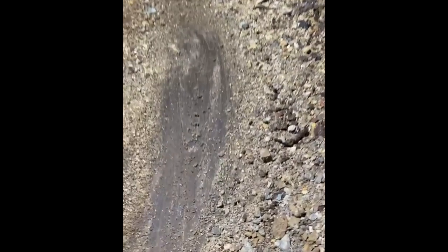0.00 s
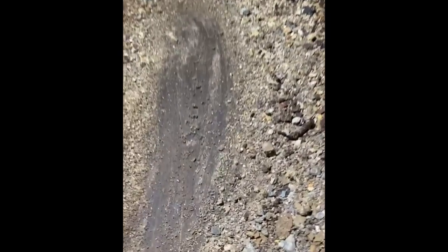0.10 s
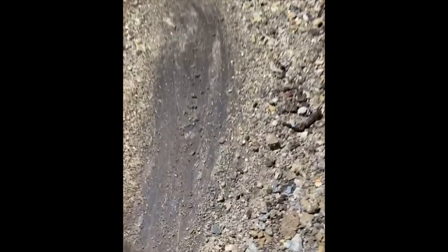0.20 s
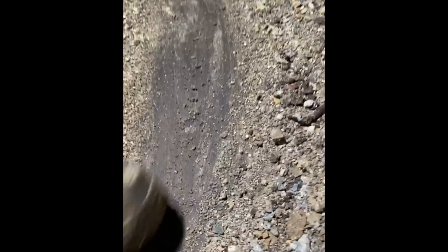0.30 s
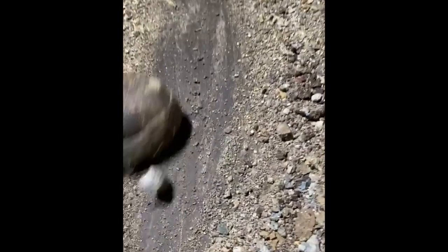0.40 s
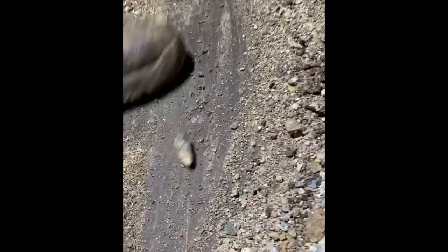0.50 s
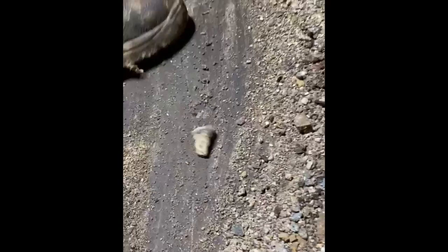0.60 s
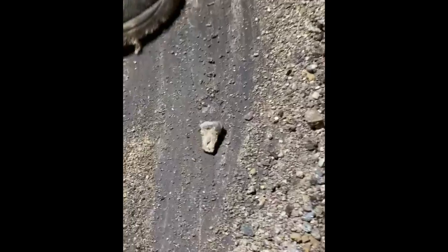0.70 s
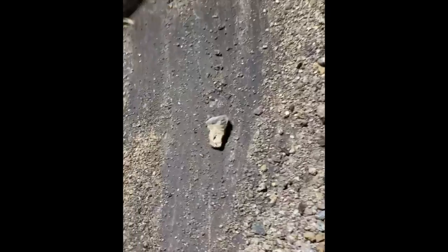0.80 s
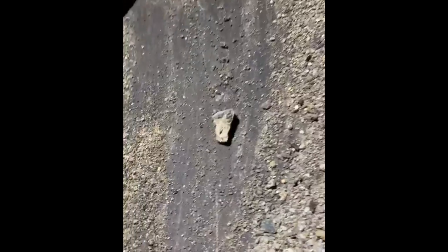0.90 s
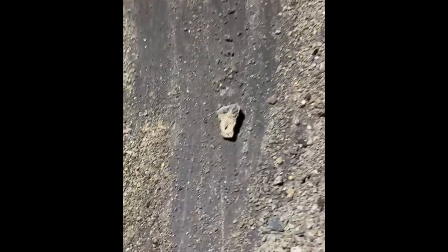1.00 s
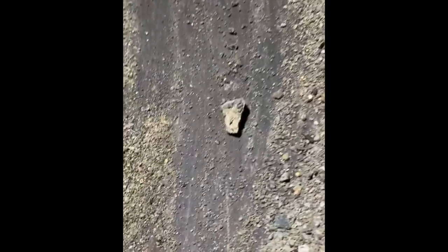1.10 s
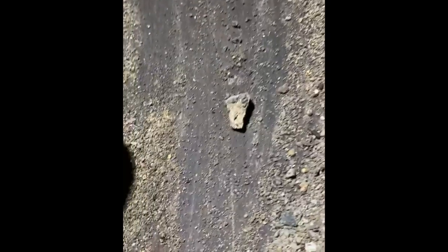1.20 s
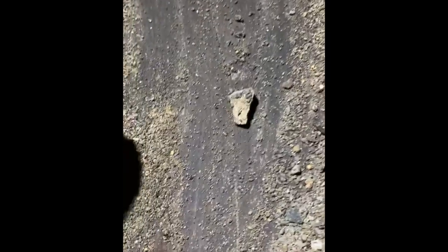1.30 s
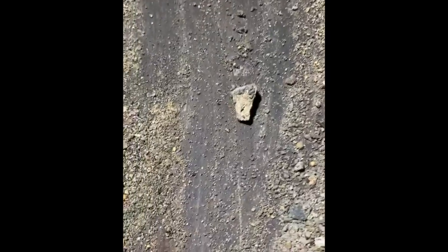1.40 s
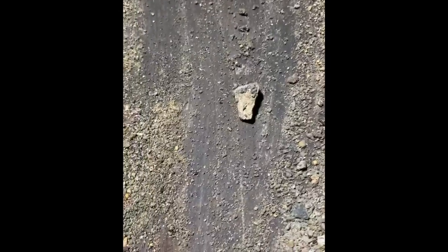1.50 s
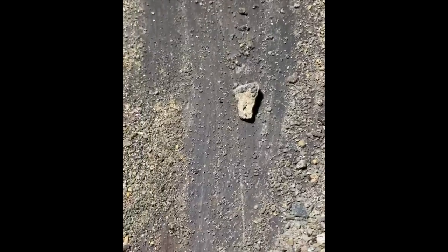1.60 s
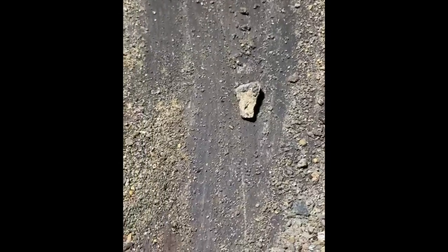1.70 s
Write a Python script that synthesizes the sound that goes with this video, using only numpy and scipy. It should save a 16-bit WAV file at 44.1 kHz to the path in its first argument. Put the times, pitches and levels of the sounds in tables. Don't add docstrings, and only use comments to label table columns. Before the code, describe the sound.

A work boot scrapes over gritty ground, kicks a stone loose with a crunch and thud

```python
import sys
import numpy as np
from scipy import signal
from scipy.fft import rfft, irfft, next_fast_len
from scipy.io import wavfile
from scipy.ndimage import uniform_filter1d

SR = 44100
rng = np.random.default_rng(int(sys.argv[2]) if len(sys.argv) > 2 else 0)


def digitize_waveform(pressure):
    field = np.atleast_2d(pressure).T
    bounded = np.clip(field, -1, 1)
    quanta = np.round(bounded * 32767).astype(np.int16)
    wavfile.write(sys.argv[1], SR, quanta)


def gain_from_decibels(decibels):
    exponent = np.asarray(decibels, float) / 20
    return 10 ** exponent


N = 79380

FAR_S = 1.44
STRIKE_RISE_S = 0.0003
# time_s, scrape_level_db, speed_db (treble gain), weight_db (rumble gain)
SOLE_MOTION = [(0, -48.5, -11, 23.5), (0.098, -44.5, -13, 2.5), (0.189, -36.5, -19, 8),
               (0.287, -41, -17, 10), (.338, -45, 0, 20), (.372, -35, -15, 8.5), (.47, -31, -8, -15),
               (0.498, -30, -13.5, 5), (0.521, -40, -4, -10), (0.632, -41.5, -4, 0.5),
               (0.776, -41.5, -1.5, 8), (.84, -54.5, -6.5, 6.5), (1.113, -63.5, -3, -1),
               (1.18, -74.5, 0.5, -3), (1.456, -70, -5.5, 4), (1.502, -48, -13, -2),
               (1.687, -53.5, -9, 7.5), (1.74, -65.5, 1, 3.5)]


def evened(x):
    return x / np.sqrt(np.mean(x ** 2) + 1e-20)


def read(points, hz):
    f, value = np.transpose(points)
    return np.interp(np.log(hz + 1), np.log(f + 1), value)


def add(mix, start_s, sound):
    part = mix[round(start_s * SR):][:len(sound)]
    part += sound[:len(part)]


def coloured(x, spectrum):
    hz = abs(np.fft.fftfreq(8192, 1 / SR))
    below = (spectrum[0][0] / 2, -70)
    above = (spectrum[-1][0] * 2, -70)
    log_gain = np.log(gain_from_decibels(read([below] + list(spectrum) + [above], hz)))
    response = np.exp(log_gain - 1j * signal.hilbert(log_gain).imag)
    taps = np.fft.ifft(response).real[:4096]
    return signal.oaconvolve(x, taps / np.linalg.norm(taps))[:len(x)]


def grains(per_s, spread_db):
    when = rng.random(N)
    size = rng.exponential(1, N)
    sign = rng.choice([-1., 1.], N)
    height = gain_from_decibels(spread_db * np.minimum(size, 4))
    return evened(sign * height * (when < per_s / SR))


def ring(hz, t60, rise_s, t):
    return (1 - np.exp(-t / rise_s)) * gain_from_decibels(-60 * t / t60) * np.sin(2 * np.pi * hz * t)


def scrape():
    # pitch_hz, density_db (per Hz)
    warm_lead_in = [(120, -31.5), (200, 3.5), (273, 4), (369, -15), (511, -9.5), (906, -9), (1030, -9),
                    (1320, -12), (4500, -38.5), (5850, -71), (9900, -120)]
    bright_push = [(120, -33.5), (200, -2.5), (449, -5), (621, -10.5), (726, -10), (1060, -3.5),
                   (1670, -4.5), (3080, -8.5), (4500, -15), (5850, -45.5), (9900, -120)]
    eased_drag = [(88, -39), (150, 4), (514, -3.5), (570, -4), (1010, -2.5), (1370, -6), (2910, -12),
                  (5000, -26), (6500, -52), (11000, -120)]
    hollow_far_shuffle = [(88, -50), (150, 1), (593, -1.5), (883, -36), (1180, -0.5), (1510, -14.5),
                          (1990, -11.5), (4000, -34), (5200, -95), (8800, -120)]
    sand_spectrum = [(2000, -2), (3000, -8), (4800, -2), (6800, -9.5), (10000, -11), (13000, -12),
                     (16000, -38)]
    rumble_spectrum = [(12, -58.5), (20, -15.5), (76, 2), (108, -5.5), (141, -5), (190, -15.5), (219, -10),
                       (350, -17.5), (460, -48), (770, -120)]

    t = np.arange(N) / SR
    rows = np.transpose(SOLE_MOTION)
    level, speed, weight = (np.interp(t, rows[0], c) for c in rows[1:])
    jerks = signal.lfilter(*signal.butter(2, 200, fs=SR), rng.standard_normal(N))
    slip_db = 2.0 * evened(jerks)

    rub = grains(per_s=4000, spread_db=1.5) * gain_from_decibels(level + slip_db)
    stage = np.searchsorted([0.3, 0.505, FAR_S], t)
    bodies = (warm_lead_in, bright_push, eased_drag, hollow_far_shuffle)
    grit = sum(coloured(rub * (stage == k), body) for k, body in enumerate(bodies))

    sand_hits = grains(per_s=9000, spread_db=-0.5)
    sand = coloured(sand_hits * gain_from_decibels(level + speed + 0.5 * slip_db), sand_spectrum)
    ground = rng.standard_normal(N) * gain_from_decibels(level + weight + 0.6 * slip_db)
    return grit + sand + coloured(ground, rumble_spectrum)


def patchy(x):
    patch_db = 2.0
    z = signal.stft(x, nperseg=256, noverlap=192)[2]
    field = rng.standard_normal(z.shape[::-1]).T
    field = uniform_filter1d(field, size=3, axis=0)
    field = evened(uniform_filter1d(field, size=30, axis=1))
    return signal.istft(z * gain_from_decibels(patch_db * field), nperseg=256, noverlap=192)[1][:N]


def rolling():
    roll_db, ring_cycles = -10, 5
    t = np.arange(N) / SR
    rows = np.transpose(SOLE_MOTION)
    pitches = np.geomspace(600, 4500, num=16)
    clicks = grains(per_s=900, spread_db=4.0)
    which = rng.integers(0, len(pitches), N)
    out = np.zeros(N)
    for k, hz in enumerate(pitches):
        click = ring(hz, ring_cycles / hz, STRIKE_RISE_S, t[:800])
        out += signal.oaconvolve(clicks * (which == k), click)[:N]
    return evened(out) * gain_from_decibels(np.interp(t, rows[0], rows[1]) + roll_db)


def stone(modes):
    damping = 0.4
    t = np.arange(3000) / SR
    taps = sum(gain_from_decibels(db) * ring(hz, damping * t60, 0.0001, t) for hz, db, t60 in modes)
    return taps / np.linalg.norm(taps)


def crunches():
    near_s = [.006, .038, .0575, .114, .1325, .169, .185, .213, .232, .2525, .26, .293, .2985, .308, .349,
              .364, .4955, .661]
    late_s = [.9935, 1.5, 1.527, 1.604, 1.6365, 1.674]
    # level_db, length_s, mid_gain_db, treble_gain_db
    bursts = [(-36, 0.008, 4, 9), (-49, 0.006, 10, 16.5), (-34.5, 0.011, -5, 3.5), (-39.5, 0.018, 1.5, 6),
              (-32.5, 0.01, -13, -5.5), (-38, 0.024, -7, 3), (-38.5, 0.0043, -4, 3), (-35, 0.0043, -7, 3),
              (-36.5, 0.012, -1.5, 6), (-39.5, 0.006, 3, 13.5), (-30.5, 0.0073, -5.5, -2.5),
              (-40, 0.034, -10.5, 0), (-24.5, 0.0054, -7, 4.5), (-15.5, 0.02, 6, 7), (-21.5, .0145, 8.5, 3),
              (-29, 0.012, 9.5, -4.5), (-32.5, 0.0047, -20, -24.5), (-34.5, 0.0026, -14, -9.5),
              (-53, 0.0038, 13, 8.5), (-51, 0.0063, 4, 17.5), (-42.5, 0.01, -15, 3.5),
              (-41.5, 0.014, -0.5, 3.5), (-34.5, 0.0022, 1.5, -1), (-52, 0.0028, 10, 16.5)]
    # pitch_hz, density_db (per Hz)
    crack_spectrum = [(120, -5), (280, -2), (600, -9), (1100, -5.5), (4300, -22), (7500, -19.5),
                      (12000, -28.5), (15500, -31.5)]
    # pitch_hz, level_db, t60_s
    near_modes = [(743, 0, .13), (290, -6, .1), (1000, -6, .05), (1244, -7, .06), (1470, -9, .05),
                  (2196, -12, .04)]
    far_modes = [(1210, -10, 0.063), (610, 0, 0.056)]
    cracks_per_s, crack_spread_db, stone_db = 1200, 12.0, -5
    mid_hz, treble_hz = 2500, 7300

    dull, mid, bright = np.zeros((3, N))
    far = np.arange(N) / SR >= FAR_S
    shape = (len(bursts), 1500)
    when = rng.random(shape)
    size, hiss = rng.standard_normal((2, *shape))
    cracks = size * gain_from_decibels(crack_spread_db) * (when < cracks_per_s / SR) + hiss

    for start_s, (db, length_s, mid_db, treble_db), crack in zip(near_s + late_s, bursts, cracks):
        u = np.arange(0, 1, 1 / (min(length_s, 0.03) * SR))
        swell = np.minimum(0.3 + u / 0.3, 1) * np.sqrt(1 - u ** 3)
        burst = gain_from_decibels(db) * evened(crack[:len(u)]) * swell
        add(dull, start_s, burst)
        add(mid, start_s, gain_from_decibels(mid_db) * burst)
        add(bright, start_s, gain_from_decibels(treble_db) * burst)

    bands = (mid_hz, "low", dull), ([mid_hz, treble_hz], "band", mid), (treble_hz, "high", bright)
    split = sum(signal.lfilter(*signal.butter(2, hz, kind, fs=SR), x) for hz, kind, x in bands)
    noise = coloured(split, crack_spectrum)
    near_rings = signal.oaconvolve(dull * ~far, stone(near_modes))
    far_rings = signal.oaconvolve(dull * far, stone(far_modes))
    return noise + gain_from_decibels(stone_db) * (near_rings + far_rings)[:N]


def thuds():
    # start_s, peak_db, pitch_hz, t60_s
    ground_thuds = [(0.176, -16, 83, 0.13), (0.2, -10, 80, 0.09), (0.267, -29, 95, 0.099),
                    (0.3813, -20, 76.8, 0.33), (0.5203, -14, 76, 0.12), (.762, -26, 151.5, 0.11),
                    (1.057, -43, 228, 0.058), (1.237, -52, 64.1, 0.22), (1.521, -35, 62.5, 0.17),
                    (1.603, -26, 94.6, 0.079), (1.674, -37, 70.5, 0.24),
                    (.3035, -4, 135, .075),
        (.3228, 3, 76, .14),
        (.7392, -11, 135, .07),
        (.7655, -25, 255, .09),
    ]
    rise_s = 0.008
    out, t = np.zeros(N), np.arange(SR // 2) / SR
    for start_s, db, hz, t60 in ground_thuds:
        boom = ring(hz, t60, rise_s, t)
        overtone = 0.22 * ring(1.83 * hz, 0.6 * t60, rise_s, t)
        add(out, start_s, -gain_from_decibels(db) * (boom + overtone))
    return out


def strikes():
    # start_s, peak_db, pitch_hz, t60_s
    knocks_and_ticks = [(.0585, -40, 820, 0.063), (0.118, -30.5, 2560, .012), (.1325, -29, 940, 0.042),
                        (.171, -25, 876, 0.023), (.179, -25, 493, 0.047), (.215, -25.5, 560, 0.041),
                        (.2345, -25.5, 920, 0.035), (.26, -23.5, 497, 0.047), (.299, -10.5, 920, 0.006),
                        (.3098, -10, 759, 0.082), (.3092, -8.5, 1200, 0.02), (.315, -12.5, 306, 0.043),
                        (.3215, -25, 888, 0.073), (.351, -18, 770, 0.022), (.3555, -16.5, 811, .04),
                        (.355, -20.5, 294, .07), (.3555, -12.5, 1754, 0.013), (.379, -27, 700, 0.017),
                        (.459, -10.5, 6700, 0.0019), (.4615, -26, 1080, 0.015), (.494, -32, 2500, 0.0061),
                        (.4975, -18.5, 1040, 0.013), (.5005, -12, 332, 0.01), (.534, -31, 1330, 0.03),
                        (.662, -27, 3030, 0.0053), (.845, -39, 606, 0.033), (.9945, -32.5, 2780, 0.0035),
                        (1.066, -46, 330, 0.064), (1.533, -49, 5770, 0.0074), (1.55, -37, 1200, .02),
                        (1.548, -44, 7630, 0.0091), (1.574, -35, 538, 0.019), (1.589, -46, 6200, .005),
                        (1.607, -37, 1150, 0.03), (1.606, -44, 7700, 0.012), (1.659, -43, 610, .02),
                        (1.676, -40, 5400, .006), (1.708, -49, 6000, .003)]
    out, t = np.zeros(N), np.arange(4000) / SR
    for start_s, db, hz, t60 in knocks_and_ticks:
        add(out, start_s, gain_from_decibels(db) * ring(hz, t60, STRIKE_RISE_S, t))
    return out


def pebbles():
    # start_s, peak_db, pitch_hz
    pebble_hits = [(0.8455, -43, 1220), (0.9028, -38, 1900), (1.0281, -75, 1170), (1.048, -42.5, 2500),
                   (1.0604, -40.5, 2384), (1.0859, -63, 1850), (1.0989, -44, 2640), (1.1104, -51.5, 2900),
                   (1.2087, -50, 1365), (1.3508, -49.5, 1830), (1.3862, -43, 2000), (1.4296, -47.5, 2035),
                   (1.4701, -40.5, 1230), (1.6896, -32, 1320), (.4595, -32.5, 5600), (1.332, -47, 10020),
                   (1.514, -42, 6530), (1.565, -39, 7750), (1.666, -34, 4330), (1.766, -41, 10640),
                   (.4972, -14, 760),
        (.9945, -42, 1100),
        (1.6375, -29, 1150),
    ]
    cycles, tick_db = 1.5, -3
    clicks = pebble_hits
    out, t = np.zeros(N), np.arange(600) / SR
    spread = rng.uniform(0.9, 1.1, (len(clicks), 2))
    for (start_s, db, hz), (low, high) in zip(clicks, spread):
        t60 = 0.005 + 3 * cycles / hz
        main = ring(hz, t60, STRIKE_RISE_S, t)
        second = ring(1.3 * low * hz, 0.7 * t60, STRIKE_RISE_S, t)
        third = ring(2.2 * high * hz, 0.15 * t60, 0.0001, t)
        add(out, start_s, gain_from_decibels(db) * (main + gain_from_decibels(tick_db) * (second + third)))
    return out


def cellar(x):
    # pitch_hz, t60_s
    decay = [(100, 0.45), (1000, 0.3), (8000, 0.093)]
    taps = np.zeros(SR // 2)
    at = np.arange(200, len(taps) - 20, 20)
    taps[at + rng.integers(0, 20, len(at))] = rng.choice([-1., 1.], len(at))
    hz, t, z = signal.stft(taps, SR, nperseg=256)
    fade = gain_from_decibels(-60 * t / read(decay, hz)[:, None])
    tail = signal.istft(z * fade, SR, nperseg=256)[1]
    return signal.fftconvolve(x, tail / np.linalg.norm(tail))[:N]


def room_floor():
    # pitch_hz, density_db (per Hz)
    quiet_spectrum = [(20, 0), (74, 3.5), (363, -31), (936, -35.5), (1500, -23), (4000, -35), (11000, -33),
                      (16000, -51.5)]
    return gain_from_decibels(-69) * evened(coloured(rng.standard_normal(N), quiet_spectrum))


def ports(x):
    # pitch_hz, phase_rad
    phase = [(200, 0), (1120, -.9), (2410, .8), (4220, 1.2), (4820, 2.9), (5450, 6.3), (8790, 8.),
             (13100, 9.2)]
    # pitch_hz, left_minus_right_db
    balance = [(30, 0), (200, .6), (380, 2.2), (700, 7), (1290, 1.5), (2380, -2), (4400, -.5), (15000, 0)]
    # pitch_hz, coherence (0 to 1)
    coherence = [(380, 1), (600, .96), (1000, .94), (3000, .82), (4850, .92), (6500, .84), (12000, .97)]

    z = signal.stft(x, nperseg=128, noverlap=96)[2]
    random_phase = np.exp(2j * np.pi * rng.random(z.shape[::-1]).T)
    scattered = 2 * signal.istft(z * random_phase, nperseg=128, noverlap=96)[1][:N]

    size = next_fast_len(N + 4096)
    hz = np.fft.rfftfreq(size, 1 / SR)
    lead = np.interp(hz, *np.transpose(phase))
    half = gain_from_decibels(read(balance, hz) / 2) * np.exp(0.5j * lead)
    same = np.clip(read(coherence, hz), 0, 1)
    shared = np.sqrt((1 + same) / 2) * rfft(x, size)
    unshared = np.sqrt((1 - same) / 2) * rfft(scattered, size)
    left = (shared + unshared) * half
    right = (shared - unshared) / half
    return irfft(np.array([left, right]), size)[:, :N]


def scene():
    drag = scrape()
    hits = crunches() + pebbles() + strikes() + thuds()
    boot = patchy(drag) + rolling() + hits
    echoes = gain_from_decibels(-23) * cellar(boot)
    return ports(boot + echoes + room_floor())


def roll_off(x):
    return signal.sosfilt(signal.butter(12, 15760, fs=SR, output="sos"), x)


def record(dry):
    return roll_off(dry)


dry = scene()
out = record(dry)
digitize_waveform(out)
```